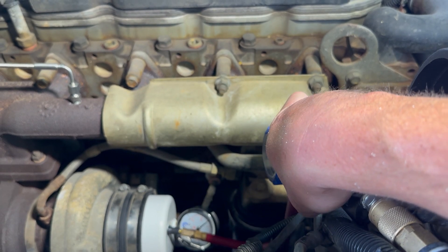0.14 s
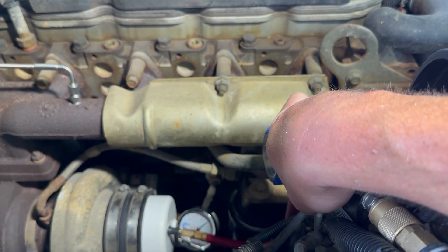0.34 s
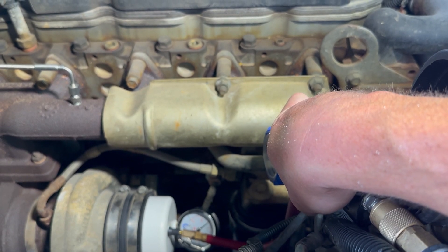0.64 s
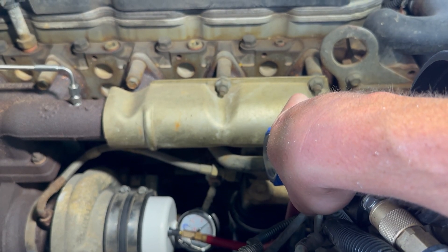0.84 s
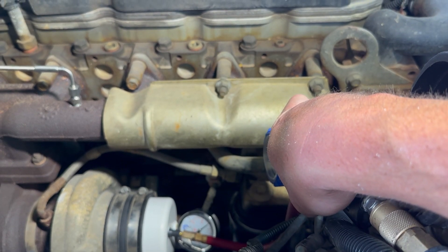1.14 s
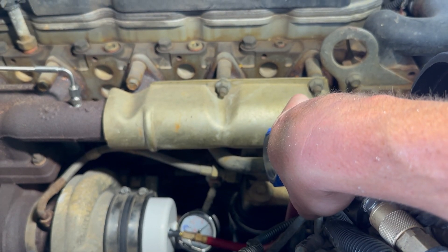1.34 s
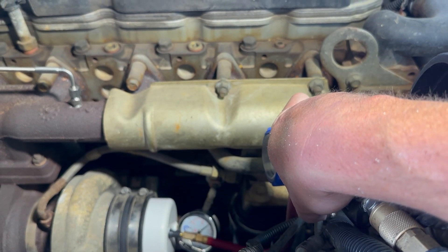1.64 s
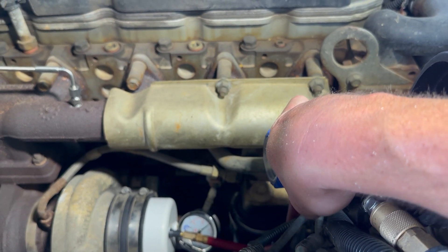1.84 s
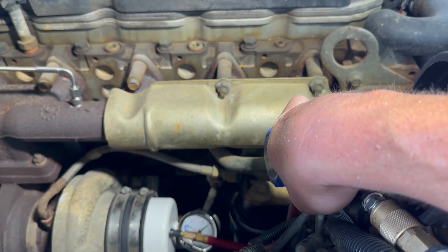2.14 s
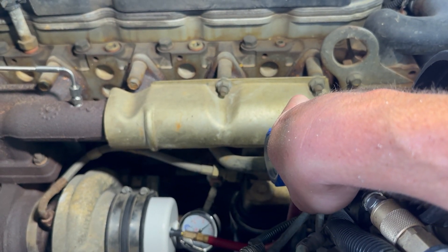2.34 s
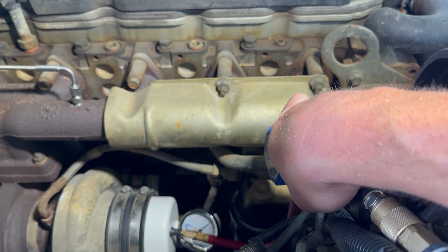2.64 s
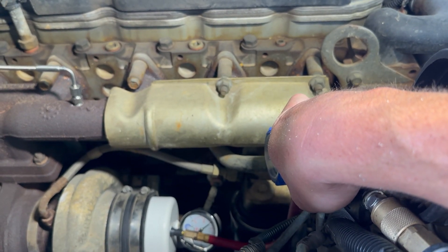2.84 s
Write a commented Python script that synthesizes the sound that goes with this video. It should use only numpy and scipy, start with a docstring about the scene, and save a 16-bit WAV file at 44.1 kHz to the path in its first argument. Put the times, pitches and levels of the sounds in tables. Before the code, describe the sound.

Compressed air hisses, bright and piercing with thin high ringing, close to the microphone. It spits open at 0.1 s, holds steadily, and is eased shut around 1.4-1.6 s with a dull hand rub and knock. A faint leak and distant low motor drone remain. At 1.75 s a second burst starts and lasts to the end, joined by a weak, wavering hollow whistle; the hose bumps softly near 2.6 s.

```python
"""Close above an engine bay, compressed air is let into the intake tubing in two long bursts.
Each jet is noise, hissing broadly and through narrow resonances of fitting and tubes; the valve opens
with spits of filtered noise and is eased shut. A faint leak hisses throughout, also as noise.
In the second burst a weak hollow whistle, narrow-band noise, joins as pressure builds.
The hand rubs (noise) and knocks (decaying sines) the hose; a far motor drones in sines over rumble."""
import sys
import numpy as np
from scipy import signal
from scipy.fft import rfft, irfft
from scipy.io import wavfile
from scipy.ndimage import uniform_filter1d, map_coordinates

SR = 44100
rng = np.random.default_rng(int(sys.argv[2]) if len(sys.argv) > 2 else 0)


def transcribe(signal):
    """Save signal, clipped to [-1, 1], as a 16-bit WAV file at the path in sys.argv[1]."""
    frames = np.atleast_2d(signal).T
    limited = np.clip(frames, -1, 1)
    pcm = np.round(limited * 32767).astype(np.int16)
    wavfile.write(sys.argv[1], SR, pcm)


N = 132300
TIME_S = np.arange(N) / SR
FREQ_HZ = np.maximum(np.arange(N // 2 + 1) * SR / N, 1)


def from_db(db):
    """Decibels to amplitude gain."""
    return 10 ** (np.asarray(db) / 20)


def across(rows):
    """Columns of a frequency table, interpolated over log frequency."""
    hz, *columns = np.transpose(rows)
    return [np.interp(np.log(FREQ_HZ), np.log(hz), column) for column in columns]


def level_over_time(rows):
    """Gain over time from rows of seconds and dB."""
    return from_db(np.interp(TIME_S, *np.transpose(rows)))


def drift(rate_hz):
    """Slow random signal with standard deviation 1, low-passed at the rate."""
    slow = irfft(rfft(rng.standard_normal(N)) / (1 + (FREQ_HZ / rate_hz) ** 2), N)
    return slow / slow.std()


def peak(centre_hz, width_hz):
    """Resonance gain: 1 at the centre, 3 dB less at the edges of the width."""
    return 1 / (1 + (np.sqrt(2) - 1) * (2 * (FREQ_HZ - centre_hz) / width_hz) ** 2)


# Two microphone ports. Each row: frequency in Hz, likeness 0-1, left leads in rad,
# left minus right in dB.
PORT_ROWS = [(150, .98, 0, -1.5), (480, .35, .3, -2), (600, .35, .9, -1.5), (670, .45, 2.8, .5),
             (1100, .45, -.2, 1), (1600, .2, 0, -2.5), (2150, .8, .5, -2), (2650, .85, -.1, -4.5),
             (2900, .4, -1.1, 2), (3170, .8, .1, 2), (3550, .5, -.8, 1), (3850, .45, -3.2, -.5),
             (4600, .5, -1, -3.5), (5050, .3, .8, -5), (5950, .35, .7, -.3), (6500, .92, 0, 0),
             (7400, .99, 0, -.2), (8000, .88, .3, -.6), (8650, .92, 1.7, 0), (8950, .95, 2.2, 0),
             (9200, .99, 3.05, 0), (9650, 1, 3.14, 0), (10420, 1, 3.14, 0), (10700, .3, .8, 0),
             (11300, 1, 0, 0), (12750, 1, 0, 0), (13250, .8, 1, 0), (13800, .55, 2.6, 0),
             (14250, 1, 3.14, 0)]


def port_mix():
    """Gains of shared noise (phase-split) and of each port's own noise, from the ports' likeness."""
    alike, lead_rad, pan_db = across(PORT_ROWS)
    alike = np.clip(alike, 0, .9995)
    sides = np.array([[1], [-1]])   # left, right
    pan = from_db(sides * pan_db / 2)
    pan = pan / np.sqrt(np.mean(pan ** 2, axis=0))
    shared = pan * np.sqrt(alike) * np.exp(.5j * sides * lead_rad)
    own = pan * np.sqrt(1 - alike)
    return shared, own


def turbulence(ports):
    """Spectrum of stereo noise, flat at 0 dB per Hz, as turbulent air reaches the ports."""
    shared, own = ports
    white = rfft(rng.standard_normal((3, N))) * np.sqrt(SR / 2)
    return shared * white[0] + own * white[1:]


WAVER_HZ = 4


def waver(spectrum, share):
    """Unsteady flow bends pitch: the noise is read at a speed drifting by this share."""
    place = np.arange(N) + np.cumsum(share * drift(WAVER_HZ))
    sides = irfft(spectrum, N)
    return rfft([map_coordinates(side, [place], order=5, mode="mirror") for side in sides])


# Leak in open air. Each row: frequency in Hz, level in dB per Hz.
LEAK_SPECTRUM = [(140, -95.5), (280, -102), (400, -105), (700, -102), (820, -106), (1100, -99),
                 (1350, -107), (2000, -108), (2700, -113), (3700, -106), (5000, -106), (6100, -100),
                 (7500, -112), (8900, -106), (10500, -116), (15500, -119)]


def background(ports):
    """Steady leak: turbulence coloured as faint hiss."""
    return irfft(from_db(across(LEAK_SPECTRUM)[0]) * turbulence(ports), N)


SHAFT_HZ, SHAFT_WANDER_SHARE, SHAFT_WANDER_HZ = 19.85, 0.011, 2.16
DRONE_SWAY_DB, DRONE_SWAY_HZ = 3.5, 4.1
# Motor orders. Each row: multiple of the shaft rate, RMS level in dB before sway, pan and swell.
SHAFT_ORDERS = [(3, -68), (4, -63.5), (6, -67)]
# Low rumble. Each row: frequency in Hz, level in dB per Hz before the swell.
RUMBLE_SPECTRUM = [(20, -110), (36, -95), (52, -75), (70, -75), (100, -79), (140, -84.5), (200, -96),
                   (300, -102), (1500, -160)]
# Swell of rumble and drone. Each row: time in seconds, gain in dB.
MOTOR_SWELL = [(0, 2), (.42, 0.5), (.55, -2), (.72, -5), (1, 1), (1.15, -0.5), (1.65, -0.5), (2, 1),
               (2.4, -1.5), (3, -4.5)]


def motor(ports):
    """Distant motor: sines at multiples of an unsteady shaft rate, swelling along with low rumble."""
    shaft_hz = SHAFT_HZ * (1 + SHAFT_WANDER_SHARE * drift(SHAFT_WANDER_HZ))
    turn_rad = 2 * np.pi * np.cumsum(shaft_hz) / SR
    drone = 0
    for order, db in SHAFT_ORDERS:
        level = np.sqrt(2) * from_db(db + DRONE_SWAY_DB * drift(DRONE_SWAY_HZ))
        drone = drone + level * np.sin(round(order) * turn_rad + rng.uniform(0, 2 * np.pi))
    rumble = irfft(from_db(across(RUMBLE_SPECTRUM)[0]) * turbulence(ports), N)
    drone_pan = from_db([[-.8], [.8]])   # stronger on the right
    return level_over_time(MOTOR_SWELL) * (rumble + drone * drone_pan)


WHISTLE_HZ, WHISTLE_WIDTH_HZ, WHISTLE_OCTAVE_DB, WHISTLE_WAVER_SHARE = 673, 30, -14.5, .014
# Whistle of the filling tubes. Each row: time in seconds, RMS level in dB.
WHISTLE_LEVEL = [(0, -93), (1.75, -76), (1.83, -67.5), (2.08, -62.5), (2.22, -66), (2.35, -61.5),
                 (2.52, -69), (2.58, -71), (2.67, -63), (2.78, -68), (2.87, -63), (3, -85)]


def whistle(ports):
    """Tubes whistle: turbulence through a resonance and its octave, wavering in pitch."""
    colour = peak(WHISTLE_HZ, WHISTLE_WIDTH_HZ)
    colour = colour + from_db(WHISTLE_OCTAVE_DB) * peak(2 * WHISTLE_HZ, 2 * WHISTLE_WIDTH_HZ)
    note = irfft(waver(colour * turbulence(ports), WHISTLE_WAVER_SHARE), N)
    return level_over_time(WHISTLE_LEVEL) * note / note.std()


RIPPLE_DB, RIPPLE_WIDTH_HZ = 1.5, 45


def ripple():
    """Reflections in the engine bay: narrow random peaks and dips over frequency, RMS gain 1."""
    size = int(RIPPLE_WIDTH_HZ * N / SR)
    bumpy = rng.standard_normal(len(FREQ_HZ))
    for _ in range(2):
        bumpy = uniform_filter1d(bumpy, size)
    gain = from_db(RIPPLE_DB * bumpy / bumpy.std())
    return gain / np.sqrt(np.mean(gain ** 2))


OPEN_S = 0.022
SURGE_DB, SURGE_S = 0.5, 0.25   # the hose's stored pressure gives a stronger start
FLUTTER_DB, FLUTTER_HZ, SWAY_DB, SWAY_HZ = 0.13, 30, 0.83, 10
TREBLE_SPLIT_HZ = 4500
# closing: down by CLOSE_FALL_DB after these times; a bend above 1 starts gently and speeds up
CLOSE_FALL_DB, CLOSE_LOW_S, CLOSE_HIGH_S = 26.5, 0.13, 0.13
CLOSE_LOW_BEND, CLOSE_HIGH_BEND = 1.1, 1.8   # treble holds longer at first
RESONANCE_WAVER_SHARE = .002
# Valve openings. Each row: opens in seconds, starts to close in seconds, level in dB,
# resonance shift in percent.
VALVE_BURSTS = [(.087, 1.395, 0, 0.048), (1.754, 3.1, -0.19, -0.045)]
# Broad jet hiss. Each row: frequency in Hz, level in dB per Hz before ripple and burst level.
JET_SPECTRUM = [(250, -98), (450, -100.5), (800, -103), (1270, -101.5), (1400, -97), (1660, -100.5),
                (1930, -100), (2000, -96), (2280, -97), (3000, -89), (3370, -87.5), (3500, -93),
                (3800, -90), (4080, -95), (4250, -87.5), (4420, -92), (4700, -88.5), (5000, -89),
                (5350, -85), (6000, -87), (6900, -87), (7800, -83.5), (8000, -86), (9200, -80), (9750, -83),
                (10150, -84), (10450, -88), (10950, -90), (11120, -86), (11850, -84), (12100, -89),
                (13100, -86), (13750, -93), (14200, -88), (14900, -82), (15400, -85), (15700, -83)]
# Fitting and tube resonances. Each row: frequency in Hz before the shift, width in Hz,
# level in dB per Hz in the first burst, then in the second, before sway and burst level.
TUBE_RESONANCES = [(820, 30, -96, -96), (930, 35, -93, -97), (1120, 95, -88.5, -91.5),
                   (2146, 26, -84, -78.5), (2515, 36, -76.5, -77.3), (2575, 48, -77.5, -80),
                   (2695, 36, -83, -82.5), (2975, 70, -85, -86), (3166, 30, -77, -80),
                   (3265, 45, -86.5, -86), (3630, 50, -84, -79), (3730, 45, -81.5, -81),
                   (3960, 70, -80, -82), (4592, 48, -89, -80), (5175, 32, -83, -79.5),
                   (5762, 32, -78.5, -76), (6505, 28, -78.5, -80), (7010, 130, -79.5, -77),
                   (7450, 90, -82, -84), (8195, 90, -73, -73.5), (8350, 120, -75.5, -73.5),
                   (8672, 38, -64, -62.3), (8790, 40, -75, -76), (8936, 34, -67.8, -68.3),
                   (9050, 100, -73, -73), (9520, 150, -70.5, -70.5), (10290, 100, -76, -76),
                   (12320, 120, -85, -82), (12835, 90, -78, -78.5), (13350, 200, -77, -74),
                   (14040, 130, -84, -83), (14450, 210, -80, -78), (14780, 120, -74.5, -76)]


def closing_gain(closing_s, fall_s, bend):
    """Gain of the valve being eased shut."""
    return from_db(-CLOSE_FALL_DB * (closing_s / fall_s) ** bend)


def resonance_groups(ports, burst, shift_percent):
    """Jet noise ringing in every third resonance: three groups, swaying apart in pitch and level."""
    powers = []
    for hz, width_hz, *burst_db in TUBE_RESONANCES:
        shifted_hz = hz * (1 + shift_percent / 100)
        powers.append((from_db(burst_db[burst]) * peak(shifted_hz, width_hz)) ** 2)
    groups = []
    for first in range(3):
        ringing = np.sqrt(sum(powers[first::3])) * turbulence(ports)
        sway = from_db(SWAY_DB * drift(SWAY_HZ))
        groups.append((waver(ringing, RESONANCE_WAVER_SHARE), sway))
    return groups


def jet(ports):
    """Jet turbulence: broad hiss plus tube resonances under the valve's flow, lows and treble apart."""
    out = 0
    broad = from_db(across(JET_SPECTRUM)[0]) * ripple()
    treble = 1 / (1 + (TREBLE_SPLIT_HZ / FREQ_HZ) ** 6)
    for burst, (opens_s, closes_s, db, shift_percent) in enumerate(VALVE_BURSTS):
        age_s = np.maximum(TIME_S - opens_s, 0)
        closing_s = np.maximum(TIME_S - closes_s, 0)
        flow_db = db + SURGE_DB * np.exp(-age_s / SURGE_S) + FLUTTER_DB * drift(FLUTTER_HZ)
        flow = np.minimum(age_s / OPEN_S, 1) ** 2 * from_db(flow_db)
        low_flow = flow * closing_gain(closing_s, CLOSE_LOW_S, CLOSE_LOW_BEND)
        high_flow = flow * closing_gain(closing_s, CLOSE_HIGH_S, CLOSE_HIGH_BEND)
        layers = [(broad * turbulence(ports), 1)]
        layers += resonance_groups(ports, burst, shift_percent)
        for air, sway in layers:
            lows = low_flow * irfft(air * (1 - treble), N)
            highs = high_flow * irfft(air * treble, N)
            out = out + sway * (lows + highs)
    return out


# Spits as the valve unseats. Each row: peak in seconds, time from peak to 1/e in seconds,
# centre in Hz, width in Hz, peak level in dB per Hz.
VALVE_SPITS = [(0.109, 0.011, 2490, 160, -75.5), (0.11, 0.016, 7700, 1300, -78.5),
               (.112, 0.014, 14000, 2000, -77), (1.771, 0.01, 2570, 150, -73),
               (1.782, 0.012, 7600, 760, -80.5), (1.785, 0.0039, 8400, 450, -72),
               (1.783, .011, 14000, 3600, -82)]


def spits(ports):
    """Air through the still narrow valve gap: short bell-shaped puffs of band-shaped noise."""
    out, air = 0, turbulence(ports)
    for peak_s, length_s, hz, width_hz, db in VALVE_SPITS:
        envelope = from_db(db) * np.exp(-((TIME_S - peak_s) / length_s) ** 2)
        out = out + envelope * irfft(air * peak(hz, width_hz), N)
    return out


BUMP_RISE_S = 0.0064
# Hand rubbing the hose. Each row: start in seconds, decay to 1/e in seconds,
# level in dB per Hz before rise and decay, centre in Hz, width in Hz.
HOSE_BUMPS = [(.125, 0.085, -84.5, 240, 380), (.125, 0.076, -94, 1470, 670), (1.34, 0.13, -81.5, 170, 138),
              (1.785, 0.055, -84.5, 260, 280.8), (1.779, 0.061, -85.5, 1400, 600),
              (2.2, 0.1, -89, 377, 220), (2.594, 0.051, -83.5, 633, 300), (2.598, 0.045, -82, 240, 157.4)]


def bumps(ports):
    """Friction on the hose: dull noise around one pitch, rising fast and dying away."""
    out, rub = 0, turbulence(ports)
    for start_s, decay_s, db, hz, width_hz in HOSE_BUMPS:
        age_s = np.maximum(TIME_S - start_s, 0)
        envelope = np.minimum(age_s / BUMP_RISE_S, 1) * np.exp(-age_s / decay_s)
        out = out + from_db(db) * envelope * irfft(rub * peak(hz, width_hz), N)
    return out


# Hand and trigger on the fitting. Each row: start in seconds, level in dB,
# frequency in Hz above which the contact is too soft to excite.
FITTING_KNOCKS = [(.142, -52, 350), (1.403, -52.5, 1500), (1.413, -49, 220), (2.607, -57, 1000),
                  (2.631, -44, 200)]
# Modes of fitting and hose. Each row: frequency in Hz, level in dB re the knock,
# decay to 1/e in seconds.
FITTING_MODES = [(191, -4.5, .011), (675, -1, 0.0041), (865, 2, .006), (1400, 3, .004)]


def knocks():
    """Blows on the damped fitting: decaying sine modes, the high ones weaker for a soft contact."""
    out = 0
    for start_s, db, soft_hz in FITTING_KNOCKS:
        age_s = np.maximum(TIME_S - start_s, 0)
        for hz, mode_db, decay_s in FITTING_MODES:
            strength = from_db(db + mode_db) / np.hypot(1, (hz / soft_hz) ** 3)
            decay = np.exp(-np.minimum(age_s / decay_s, 20))
            out = out + strength * decay * np.sin(2 * np.pi * hz * age_s)
    return out


def scene():
    """Sum of all sources at the two ports."""
    ports = port_mix()
    steady = background(ports) + motor(ports) + whistle(ports)
    air = jet(ports) + spits(ports)
    return steady + air + bumps(ports) + knocks()


LOW_CUT_HZ, CUTOFF_HZ = 34, 15750


def record(dry):
    """The microphone rolls off the deepest bass; a steep low-pass cuts the top."""
    low_cut = signal.butter(4, LOW_CUT_HZ, "high", fs=SR, output="sos")
    top_cut = signal.ellip(16, .1, 80, CUTOFF_HZ, fs=SR, output="sos")
    return signal.sosfilt(top_cut, signal.sosfilt(low_cut, dry))


dry = scene()
out = record(dry)
transcribe(out)
```